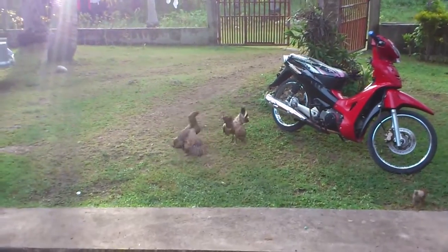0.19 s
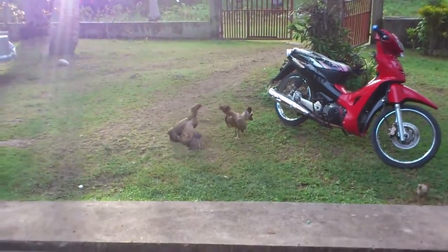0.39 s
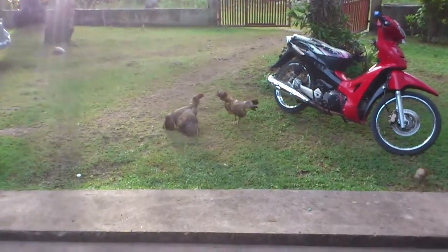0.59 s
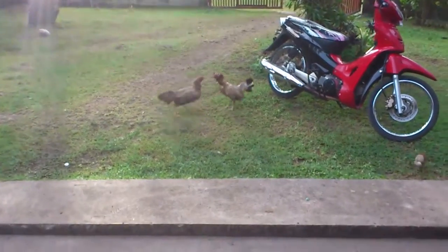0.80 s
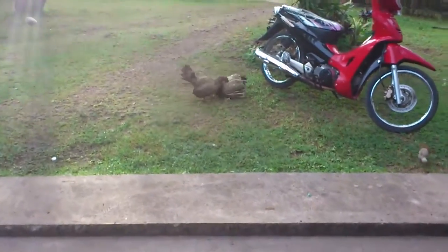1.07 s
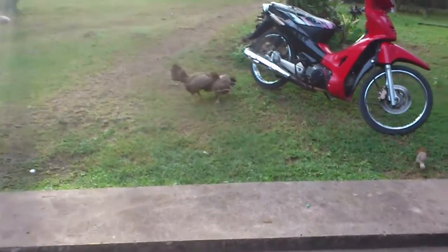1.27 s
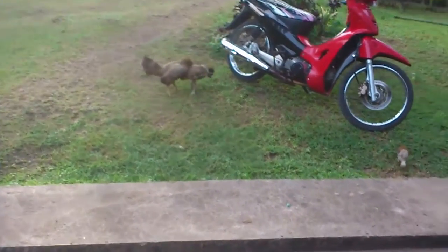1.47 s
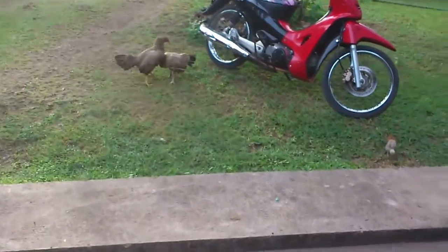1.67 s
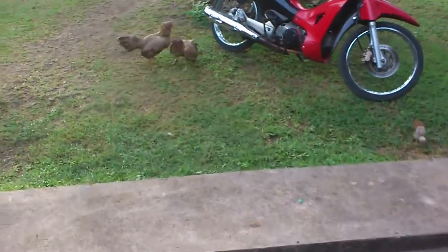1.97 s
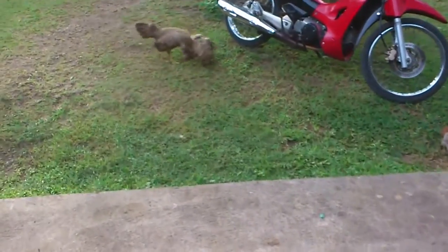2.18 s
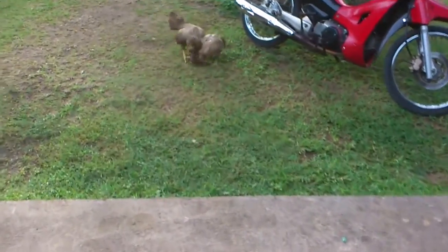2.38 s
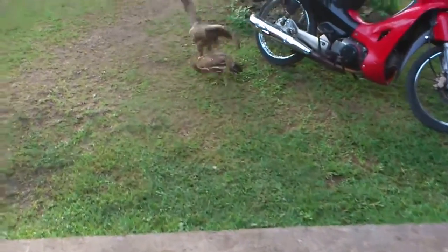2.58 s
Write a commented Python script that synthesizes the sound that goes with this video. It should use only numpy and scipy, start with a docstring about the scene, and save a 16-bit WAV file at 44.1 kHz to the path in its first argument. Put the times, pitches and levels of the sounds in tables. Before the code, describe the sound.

High, sliding chick cheeps in an open yard, with faint wing flutters and feather crackle

```python
"""Chicks cheep in a grassy yard, a few metres from a hand-held camera with two microphone ports.
Each cheep is a falling, near-pure whistle: a sine on a pitch curve with weak overtones.
Two young chickens scuffle: wings swish as shaped noise and feathers crackle as random ticks and snaps.
The yard walls echo birds and wings as decaying noise; behind lie wind puffs, hiss, faint far tones and rumble."""
import sys
import numpy as np
from scipy import signal
from scipy.fft import rfft, irfft
from scipy.io import wavfile
from scipy.ndimage import uniform_filter1d

SR = 44100
rng = np.random.default_rng(int(sys.argv[2]) if len(sys.argv) > 2 else 0)


def dump_mix(stems):
    """Bounce the given channels to the path in sys.argv[1] as a 16-bit WAV at rate SR."""
    frames = np.atleast_2d(stems).T  # one column per channel
    limited = np.clip(frames, -1, 1)  # hard clip at full scale
    pcm = np.round(limited * 32767).astype(np.int16)
    wavfile.write(sys.argv[1], SR, pcm)


N = 119070

# Whistles of the chicks in front, one curve each: [t/s, f/Hz, level/dB]
FRONT_CALLS = [
    [(.186, 5630, -46), (.197, 5540, -38.5), (.21, 5220, -40.5), (.222, 4120, -33.5), (.245, 3486, -30),
     (.27, 3138, -28), (.3, 3106, -46), (.33, 3148, -31.5), (.345, 3300, -55)],
    [(.186, 4910, -46), (.2, 5110, -47), (.215, 4450, -37.5), (.222, 4320, -52)],
    [(.275, 3073, -33), (.3, 2829, -33), (.33, 3040, -34.5), (.345, 2824, -41), (.37, 2680, -48.5),
     (.395, 2470, -49)],
    [(.305, 2330, -53), (.315, 2065, -52), (.34, 2074, -45), (.353, 1880, -50)],
    [(.33, 2500, -42), (.345, 2240, -46), (.355, 2100, -57)],
    [(.66, 4700, -46), (.68, 5050, -41), (.7, 4910, -36), (.71, 4500, -51)],
    [(.655, 5010, -62), (.675, 5366, -34.5), (.692, 4980, -38), (.705, 4180, -30), (.735, 3927, -30.5),
     (.755, 3556, -27.5), (.78, 3190, -47.5), (.805, 3100, -30.5), (.84, 3110, -65)],
    [(.812, 2730, -32), (.825, 2064, -49.5), (.84, 1913, -41), (.852, 1860, -79)],
    [(1.66, 6300, -65), (1.68, 5980, -43), (1.71, 5700, -60), (1.73, 4820, -46), (1.755, 3990, -38.5),
     (1.775, 3396, -48), (1.8, 3240, -43), (1.85, 3130, -44), (1.91, 3130, -78)],
    [(1.785, 3115, -28), (1.8, 2880, -49.5), (1.825, 2450, -48.5), (1.848, 2418, -43.5), (1.86, 2050, -42),
     (1.885, 1950, -41.5), (1.9, 1670, -47.5)],
]
# Whistles of the chicks off to the side, one curve each: [t/s, f/Hz, level/dB]
SIDE_CALLS = [
    [(.44, 4150, -54), (.465, 3838, -55), (.495, 3677, -46.5), (.54, 3502, -44), (.56, 3320, -47),
     (.578, 2900, -53), (.605, 2840, -54.5), (.635, 2664, -35.5)],
    [(.565, 4090, -51), (.585, 3885, -46), (.605, 3650, -46.5), (.645, 3430, -42), (.66, 3020, -39),
     (.69, 3013, -51.5), (.72, 2693, -49)],
    [(.93, 4050, -62), (.96, 3920, -44), (.985, 3816, -47.5), (1.02, 3530, -38), (1.033, 3373, -43.5),
     (1.042, 3012, -39), (1.065, 2830, -45.5), (1.085, 2434, -44.5)],
    [(1.08, 3910, -41.5), (1.105, 3724, -46), (1.14, 3254, -44.5), (1.153, 3093, -43.5),
     (1.17, 2878, -41.5), (1.19, 2772, -46.5), (1.215, 2510, -65)],
    [(1.545, 4860, -72), (1.56, 4967, -47.5), (1.58, 4866, -57), (1.595, 4400, -61), (1.61, 3825, -43.5),
     (1.65, 3474, -48), (1.67, 3150, -45), (1.71, 2907, -45), (1.74, 2704, -48.5)],
    [(1.675, 3780, -44), (1.695, 3677, -49.5), (1.74, 3512, -46), (1.775, 3417, -41), (1.8, 3230, -43)],
    [(2.13, 4350, -66), (2.165, 3880, -54), (2.21, 3560, -50.5), (2.245, 3471, -42.5), (2.258, 3390, -42.5),
     (2.27, 2936, -43.5), (2.285, 2585, -56), (2.305, 2190, -58)],
    [(2.31, 4083, -52), (2.33, 3718, -50.5), (2.36, 3568, -46.5), (2.405, 3510, -44.5),
     (2.425, 3330, -46.5), (2.45, 3094, -50.5), (2.48, 2714, -48.5), (2.5, 2510, -58)],
    [(2.51, 2860, -47), (2.525, 2708, -54), (2.545, 2520, -69)],
]
# 2nd and 3rd partial relative to the whistle at full voice: [level/dB, level/dB]
FRONT_OVERTONES = (-10.5, -28)
SIDE_OVERTONES = (-5.5, -40)
# Throat response, where the highest overtones fall away: [f/Hz, level/dB]
THROAT_RESPONSE = [(8200, 0), (9500, -1), (12500, 2), (14000, -28)]
FULL_VOICE_DB, OVERTONE_GROWTH = -30, .6  # growth: overtone dB per dB of voice
QUAVER_HZ, FLUTTER_DB = 25, 1.6  # rms pitch and level wobble
# Camera body shading of each direction, left minus right: [f/Hz, level/dB]
FRONT_SHADING = [(2000, 1.5), (2450, -3), (3100, 13.5), (3500, -1.5), (3950, -3.5), (5300, -9), (7000, 2.5),
                 (10000, 14)]
SIDE_SHADING = [(2950, 3), (3500, -4.5), (3900, -6.5), (5000, -2), (7000, 8)]
WING_SHADING = [(3000, 0.5), (5000, -10), (10000, 23.5)]
# Time by which the left port lags the right, for each direction: [f/Hz, lag/ms]
FRONT_LEFT_LAG = [(2000, 0.038), (3100, 0.081), (3600, 0.1), (4200, 0.095), (5200, 0.062)]
SIDE_LEFT_LAG = [(2000, -.28), (8000, -0.311)]
WING_LEFT_LAG = [(300, 0.09), (9000, 0.031)]
# Side chicks sliding right as the camera turns, left minus right: [t/s, level/dB]
SIDE_SLIDE = [(0, -2.5), (1, -0.5), (1.7, -5), (2.4, -8)]

# Wing beats: [peak t/s, half length/s, swish level/dB, crackle level/dB]
WING_BEATS = [(0.063, 0.063, -57, -56.5), (1.061, 0.041, -56.5, -57), (1.157, .025, -58.5, -69),
              (1.742, 0.035, -58.5, -69), (2.517, 0.023, -66, -55.5), (2.576, 0.022, -58, -57.5),
              (2.616, 0.029, -48, -58), (2.69, 0.026, -56, -57)]
# Spectrum of swish, crackle and snaps: [f/Hz, level/dB]
WING_SPECTRUM = [(200, -3), (600, -4.5), (2000, -6), (4500, -2), (8000, -6), (12000, -15), (16000, -30)]
# Quill snaps, single clicks before colouring: [t/s, level/dB]
QUILL_SNAPS = [(2.572, -44), (2.582, -42), (2.594, -45), (2.623, -36), (2.695, -41)]
CRACKLES_PER_S = 1500

# Colour of the yard's echoes: [f/Hz, level/dB]
YARD_SPECTRUM = [(1500, -11.5), (2200, -4.5), (3000, -2), (4000, -1.5), (5000, -5.5), (10000, -6)]
NEAR_T60_S, NEAR_DB = 0.36, -3  # step and wall close by; level before colouring
YARD_T60_S, YARD_DB, YARD_GAP_S = 0.4, -5.5, .002  # yard walls; the gap is silent
SCATTER_DB, SCATTER_PER_S = 1.5, 250  # stirring leaves break up the echoes

# Wind puffs on the ports, level at the right port: [peak t/s, level/dB]
WIND_PUFFS = [(.72, -55), (1.53, -51), (1.64, -58), (2.025, -41), (2.3, -48.5)]
GUST_HZ, GUST_S = 45.3, 0.024  # low-pass corner, half length

# Spectrum of the high hiss: [f/Hz, level/dB]
SHIMMER_SPECTRUM = [(6000, -50), (8000, -14), (9500, -2.5), (11300, 2.5), (11900, -5), (12200, -45)]
SHIMMER_DB, SHIMMER_PAN_DB = -53.5, 22  # level at the left port, drop to the right

# Faint far tones: [start t/s, length/s, f/Hz, level/dB]
FAR_WHISTLES = [(0.96, 0.095, 470, -91), (1.48, 0.12, 982, -68.5), (1.77, 0.162, 980, -72.5),
                (1.556, .5, 1660, -76), (2.2, .2, 1545, -69), (1.26, .08, 1530, -74.5)]

# Spectrum of far rumble and hiss: [f/Hz, level/dB]
AIR_SPECTRUM = [(20, -6), (40, -3.5), (85, 0), (140, -3), (220, -11), (900, -19), (2200, -22.5),
                (3700, -16.5), (8500, -20.5), (12000, -27), (16000, -30)]
# Balance of the air, left minus right: [f/Hz, level/dB]
AIR_PAN = [(30, 2), (100, -1), (1000, 1.5), (4500, -6), (7000, 2.5), (15000, 2)]
# Share of the air's power common to both ports: [f/Hz, share]
AIR_COMMON = [(30, 0.63), (100, 0.91), (300, 0.58), (1000, 0.21), (3000, 0.033)]
# Swell of the rumble, the lowest three octave bands: [t/s, level/dB]
RUMBLE_SWELL = [(0, -2.5), (1.05, -2), (1.2, 0.5), (1.45, -3), (1.74, 0), (2.1, -2.5), (2.5, 0), (2.7, 0)]
AIR_DB = -55.5  # rms over both ports

TOP_HZ = 15800


def chicks(calls, overtones_db):
    """Near-sine whistles; overtones grow with the voice, and pitch quavers as level flutters."""
    t = np.arange(N) / SR
    out = np.zeros(N)
    quaver = QUAVER_HZ * walk(150)
    flutter = undb(FLUTTER_DB * walk(90))
    for call in calls:
        s, hz, db = np.array(call, float).T
        on = slice(int(s[0] * SR), int(s[-1] * SR))

        def smooth(v):
            """Curve between the points, its corners rounded over 5 ms."""
            return uniform_filter1d(np.interp(t[on], s, v), size=221, mode="nearest")

        level = smooth(db)
        phase = 2 * np.pi * np.cumsum(smooth(hz) + quaver[on]) / SR
        tone = np.sin(phase)
        for partial, partial_db in enumerate(overtones_db, start=2):
            gain = undb(partial_db + OVERTONE_GROWTH * (level - FULL_VOICE_DB))
            tone = tone + gain * np.sin(partial * phase)
        edge = np.clip(np.minimum(t[on] - s[0], s[-1] - t[on]) / .008, 0, 1)  # 8 ms ramps
        out[on] += np.sqrt(2) * undb(level) * edge * tone
    return colour(out * flutter, THROAT_RESPONSE)


def wings():
    """Each beat swishes air as grainy noise; feathers crackle in random ticks and quills snap."""
    swish_level = sum(undb(db) * bump(s, half) for s, half, db, _ in WING_BEATS)
    crackle_level = sum(undb(db) * bump(s, 1.46 * half) for s, half, _, db in WING_BEATS)
    grain = undb(1.06 * walk(200))
    swish = swish_level * grain * unit(colour(rng.standard_normal(N), WING_SPECTRUM))

    struck = rng.random(N) < CRACKLES_PER_S / SR
    strength = undb(4.6 * rng.exponential(size=N))
    ticks = struck * strength * rng.choice([-1, 1], N)
    crackle = crackle_level * unit(colour(ticks, WING_SPECTRUM))

    snaps = np.zeros(N)
    for s, db in QUILL_SNAPS:
        snaps[int(s * SR)] = undb(db)
    return colour(snaps, WING_SPECTRUM) + swish + crackle


def yard(x):
    """Echoes of near surfaces and yard walls: two overlaid decays of noise, independent at each port."""
    t = np.arange(int(.8 * SR)) / SR

    def fade(t60):
        """Decay of 60 dB in t60 seconds, at unit energy."""
        decay = undb(-60 * t / t60)
        return decay / np.sqrt(np.sum(decay ** 2))

    near = undb(NEAR_DB) * fade(NEAR_T60_S)
    walls = undb(YARD_DB) * fade(YARD_T60_S)
    shape = np.hypot(near, walls) * (t > YARD_GAP_S)
    echo = rng.standard_normal((2, len(t))) * shape
    return colour(signal.fftconvolve(x[None], echo, axes=1)[:, :N], YARD_SPECTRUM)


def gusts():
    """Wind puffs on the ports: short swells of low-passed noise, mostly on the right."""
    low_pass = signal.butter(2, GUST_HZ, fs=SR, output="sos")
    low = unit(signal.sosfilt(low_pass, rng.standard_normal((2, N))))
    ports = undb(np.array([[-14], [0]]))
    return low * ports * sum(undb(db) * bump(s, GUST_S) for s, db in WIND_PUFFS)


def shimmer():
    """High hiss, mostly on the left: band-shaped noise with a slight random flicker."""
    hiss = unit(colour(rng.standard_normal((2, N)), SHIMMER_SPECTRUM))
    ports_db = np.array([[0], [-SHIMMER_PAN_DB]])
    return hiss * undb(SHIMMER_DB + 0.5 * walk(120) + ports_db)


def far_tones():
    """Faint sines from far off, wavering in level and phase."""
    t = np.arange(N) / SR
    waver = undb(2.6 * walk(24.62))
    tones = np.zeros(N)
    for s, long, hz, db in FAR_WHISTLES:
        edge = np.clip(np.minimum(t - s, s + long - t) / 0.0068, 0, 1)  # 6.8 ms ramps
        tones += undb(db) * np.sqrt(2) * np.sin(2 * np.pi * hz * t + 1.7 * walk(30.45)) * edge
    return waver * tones


def air():
    """Far rumble and hiss: noise partly common to both ports, each octave band swelling and flickering."""
    hz = np.arange(N // 2 + 1) * SR / N
    both, left, right = rfft(rng.standard_normal((3, N)))
    alike = np.clip(at(AIR_COMMON, hz), 0, 1)
    pan = at(AIR_PAN, hz) / 2
    noise = np.sqrt(alike) * both + np.sqrt(1 - alike) * np.array([left, right])
    spec = noise * undb(at(AIR_SPECTRUM, hz) + np.array([pan, -pan]))

    octave = np.log2(np.maximum(hz, 1) / 30)
    swell = np.interp(np.arange(N) / SR, *np.array(RUMBLE_SWELL).T)
    out = 0
    for k in range(10):  # overlapping bands centred on 30 Hz, 60 Hz and so on
        band = irfft(spec * np.clip(1 - abs(octave - k), 0, 1), N)
        out = out + band * undb(1.7 * walk(1.43) + 1.43 * walk(9.05) + (k < 3) * swell)
    return unit(out) * undb(AIR_DB)


def undb(db):
    """Amplitude from dB."""
    return 10 ** (np.asarray(db) / 20)


def unit(x):
    """Scale to an rms of 1."""
    return x / np.sqrt(np.mean(x ** 2))


def at(table, hz):
    """Table of (f/Hz, value) read on a log frequency axis."""
    tab = np.array(table, float)
    return np.interp(np.log(np.maximum(hz, 1)), np.log(tab[:, 0]), tab[:, 1])


def colour(x, table):
    """Shape the spectrum by (f/Hz, level/dB) points."""
    n = x.shape[-1]
    return irfft(rfft(x) * undb(at(table, np.arange(n // 2 + 1) * SR / n)), n)


def walk(rate):
    """Random wander of unit rms: levels held 1 / rate seconds, then smoothed twice."""
    k = int(SR / rate)
    steps = np.repeat(rng.standard_normal(N // k + 1), k)
    return unit(uniform_filter1d(uniform_filter1d(steps, k), k)[:N])


def bump(s, half):
    """Bell-shaped swell peaking at s; half its length is two standard deviations."""
    return np.exp(-.5 * ((np.arange(N) / SR - s) / (half / 2)) ** 2)


def place(x, left_lag_ms, pan_db):
    """Direction at the two ports: a lag and a level difference, both by frequency."""
    hz = np.arange(N // 2 + 1) * SR / N
    spec = rfft(x)
    pan = undb(at(pan_db, hz) / 2)
    lag = np.exp(-2j * np.pi * hz * at(left_lag_ms, hz) / 1000)
    return irfft(np.array([spec * pan * lag, spec / pan]), N)


def scene():
    """Birds and wings placed around the camera, their echoes, and the background."""
    front = chicks(FRONT_CALLS, FRONT_OVERTONES)
    side = chicks(SIDE_CALLS, SIDE_OVERTONES)
    flap = wings()
    turn = undb(np.interp(np.arange(N) / SR, *np.array(SIDE_SLIDE).T) / 2)
    turn = np.array([turn, 1 / turn])
    direct = place(front, FRONT_LEFT_LAG, FRONT_SHADING)
    direct = direct + turn * place(side, SIDE_LEFT_LAG, SIDE_SHADING)
    direct = direct + place(flap, WING_LEFT_LAG, WING_SHADING)
    # the side chicks feed the echoes more strongly; the echoes follow the turn half as far
    scatter = undb(SCATTER_DB * np.array([walk(SCATTER_PER_S), walk(SCATTER_PER_S)]))
    echoes = np.sqrt(turn) * yard(front + undb(5.5) * side + flap) * scatter
    return direct + echoes + gusts() + shimmer() + far_tones() + air()


def record(dry):
    """The camera drops the deepest bass and cuts the top."""
    bass_cut = signal.butter(2, 22, "highpass", fs=SR, output="sos")
    top_cut = signal.ellip(10, .2, 70, TOP_HZ, fs=SR, output="sos")
    return signal.sosfilt(top_cut, signal.sosfilt(bass_cut, dry))


dry = scene()
out = record(dry)
dump_mix(out)
```